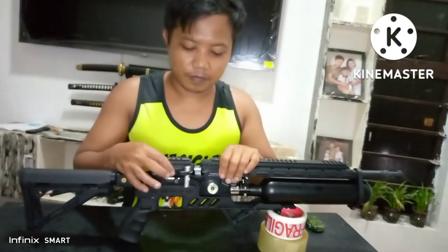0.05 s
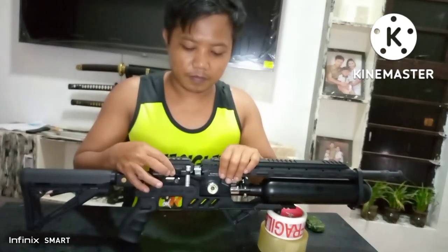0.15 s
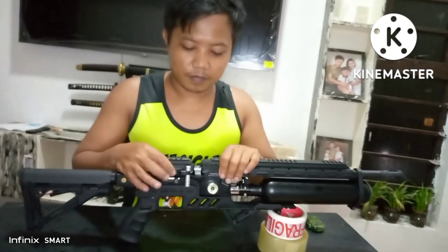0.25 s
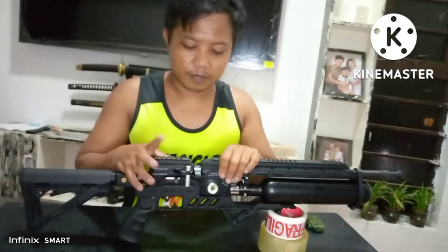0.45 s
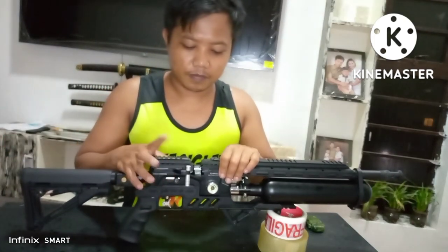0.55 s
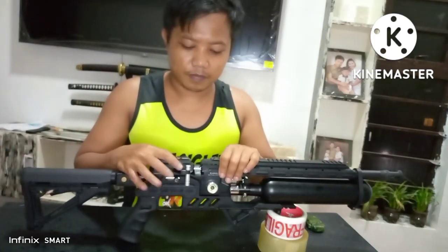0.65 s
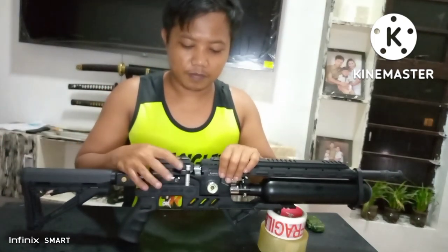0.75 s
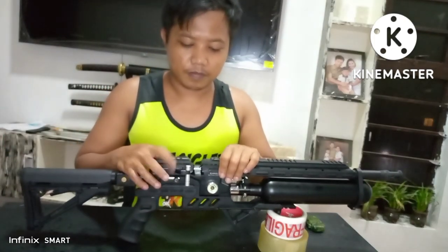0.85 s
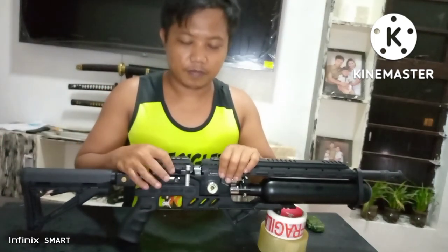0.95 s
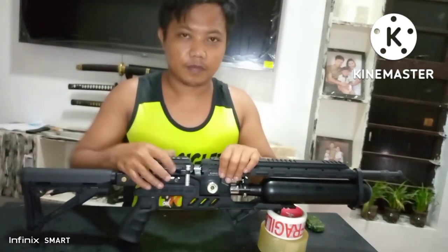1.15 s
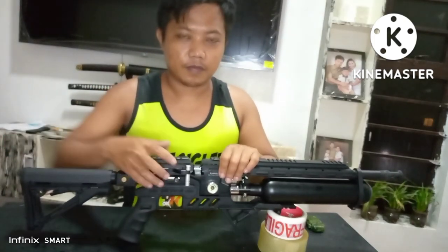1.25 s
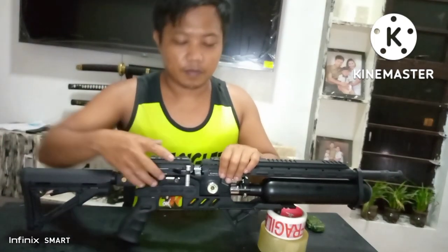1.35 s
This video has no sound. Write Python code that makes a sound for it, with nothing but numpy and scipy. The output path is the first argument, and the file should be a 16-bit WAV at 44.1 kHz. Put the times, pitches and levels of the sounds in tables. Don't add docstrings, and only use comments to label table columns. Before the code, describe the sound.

Hard bright steel snap of a rifle side lever, ringing briefly in a hard-walled room

```python
import sys
import numpy as np
from scipy import signal
from scipy.fft import rfft, irfft, next_fast_len
from scipy.io import wavfile
from scipy.ndimage import uniform_filter1d, map_coordinates

SR = 44100
rng = np.random.default_rng(int(sys.argv[2]) if len(sys.argv) > 2 else 0)


def put_to_file(sound):
    columns = np.atleast_2d(sound).T
    safe = np.clip(columns, -1, 1)
    whole_steps = np.round(safe * 32767)
    wavfile.write(sys.argv[1], SR, whole_steps.astype(np.int16))


def ratio(d):
    e = np.asarray(d, float) / 20
    return 10 ** e


N = 61739


def unit(x):
    return x / np.sqrt(np.mean(x ** 2) + 1e-20)


def along(points, hz):
    f, value = np.transpose(points)
    return np.interp(np.log(hz + 1), np.log(f + 1), value)


def wobble(rate):
    knots = rng.standard_normal(int(N * rate / SR) + 4)
    return map_coordinates(knots, [np.arange(N) * rate / SR])


def filtered(x, response):
    m = next_fast_len(len(x) + SR // 2)
    return irfft(rfft(x, m) * response(np.fft.rfftfreq(m, 1 / SR)), m)[:len(x)]


def through(x, body):
    def response(f):
        total = 0
        for k, (centre, width, db) in enumerate(body):
            band = 1j * f * width / (centre * centre - f * f + 1j * f * width)
            total = total + (-1) ** k * ratio(db) * band ** 2
        return total
    return filtered(x, response)


def swells(rows):
    t = np.arange(N) / SR
    return sum(ratio(db) * np.exp(-np.abs((t - s) / half) ** 3) for s, half, db in rows)


# t/s, level/dB
CHIRP_LEVEL = [
    (0, -55.5),
    (.04, -58.5),
    (.06, -58.5),
    (.1, -53.5),
    (0.127, -64.5),
    (.175, -63.5),
    (.2, -83),
]
# f/Hz, width/Hz, level/dB
CHIRP_BANDS = [(3830, 570, -7), (4217, 82, 0.5)]


def chirp():
    s, db = np.transpose(CHIRP_LEVEL)
    level_db = np.interp(np.arange(N) / SR, s, db, right=-120.0) - 3.5 * wobble(70)
    return ratio(level_db) * unit(through(rng.standard_normal(N), CHIRP_BANDS))


def air(spectrum, patchy_db):
    z = signal.stft(rng.standard_normal(N), nperseg=512)[2]
    field = uniform_filter1d(rng.standard_normal(z.shape), size=4, axis=0)
    field = uniform_filter1d(field, size=12, axis=1)
    noise = signal.istft(z * ratio(patchy_db * unit(field)), nperseg=512)[1][:N]
    return unit(filtered(noise, lambda hz: ratio(along(spectrum, hz))))


# f/Hz, level/dB (per Hz)
BUSTLE_SPECTRUM = [(15, -37), (25, -15), (168, 1), (421, -4.5), (616, -3), (1400, -4.5), (2460, -11),
                   (2660, -10.5), (3000, -13), (3900, -66), (6600, -120)]
HISS_SPECTRUM = [(1760, -11.5), (3000, -3), (4900, -3.5), (6130, -3.5), (7200, -0.5), (10900, -26),
                 (13700, -29), (14900, -15), (16000, -27)]
# f/Hz, width/Hz, level/dB
FAN_WHINE = [(2580, 61, 0.1), (171.5, 40, 4.5)]


def room_tone():
    bustle = ratio(-63.5) * air(BUSTLE_SPECTRUM, patchy_db=1.0)
    hiss = ratio(-68) * air(HISS_SPECTRUM, patchy_db=-1.5)
    whine_db = -73.5 + 2.5 * wobble(12)
    whine = ratio(whine_db) * unit(through(rng.standard_normal(N), FAN_WHINE))
    return bustle + hiss + whine


THUMP_HZ = 73.5


def draught():
    stir = unit(through(rng.standard_normal(N), [(THUMP_HZ, 55, 0)]))
    return ratio(-72.5 + 2 * wobble(13.5)) * stir


# f/Hz, t60/s
ROOM_DECAY = [(800, .35), (1100, 0.44), (1600, 0.35), (2500, 0.46), (3300, 0.33), (5000, 0.4),
              (10000, 0.27), (15000, 0.23)]
# f/Hz, build/s
ECHO_BUILD = [(1000, 0.0083), (2000, 0.0017), (5000, 0.001)]


def echo():
    hz, t, z = signal.stft(rng.standard_normal(SR // 2), SR, nperseg=128)
    decay = ratio(-60 * t / along(ROOM_DECAY, hz)[:, None])
    build = 1 - np.exp(-t / along(ECHO_BUILD, hz)[:, None])
    tail = signal.istft(z * decay * build, SR, nperseg=128)[1][:SR // 2]
    return tail / np.linalg.norm(tail)


# t/s (after the blow), level/dB
WALL_ECHOES = [
    (.0063, -1),
    (.008, -9),
    (.0115, -4),
]


def strike(events, body, modes, rattle_db, rattle_s, ring_db, wet_db, gain_db):
    blow_size, bluntness = 0.78, 0.44
    smear_hz, cut_s = 45.4, 0.19
    out, t = np.zeros(N + SR), np.arange(SR // 2) / SR
    click = 1.0 * (t == 0)
    for s, db in events:
        rattle = 0.23 * ratio(rattle_db - 60 * t / rattle_s) * rng.standard_normal(len(t))
        force = rattle + ratio(wet_db) * echo()
        force[:2] = blow_size, blow_size * bluntness
        for lag, loss_db in WALL_ECHOES:
            force[round(lag * SR)] += ratio(loss_db)
        blow = through(force, body) / np.abs(through(click, body)).max()
        ring = 0
        for hz, level_db, t60 in modes:
            cycles = rng.random() + np.cumsum(hz + smear_hz * wobble(149.8)[:len(t)]) / SR
            ring = ring + ratio(level_db - 60 * t / t60) * np.sin(2 * np.pi * cycles)
        onset = 1 - np.exp(-t / 0.0022)
        ring = ratio(ring_db + 2.7 * wobble(59.4)[:len(t)]) * ring * onset
        out[round(s * SR):][:len(t)] += ratio(db + gain_db - (t / cut_s) ** 6) * (blow + ring)
    return out[:N]


# t/s, peak level/dB
TICK_TIMES = [
    (.0575, -45),
    (.12, -68),
    (.201, -64),
    (1.04, -64),
]
# f/Hz, width/Hz, level/dB
TICK_RESONANCES = [(5770, 5500, 15.5), (8100, 2200, 5), (10100, 820, -17), (14880, 500, 20)]
# f/Hz, level/dB, t60/s
TICK_MODES = [(8800, 5.5, 0.04), (9940, 8, 0.025), (10900, -4, .08)]
TICK_MIX = dict(rattle_db=-4.5, rattle_s=0.043, ring_db=-9, wet_db=9.5, gain_db=1)


def finger_ticks():
    return strike(TICK_TIMES, TICK_RESONANCES, TICK_MODES, **TICK_MIX)


# t/s, peak level/dB
SNAP_TIMES = [
    (.223, -13),
]
# f/Hz, width/Hz, level/dB
SNAP_RESONANCES = [(1033, 480, -13), (2060, 401, -5), (2588, 780, -6), (3724, 800, -7.5), (4803, 646, 1.2),
                   (5680, 990, -2.5), (7040, 1500, -2.5), (8390, 2960, -13), (10630, 2900, -19.5),
                   (15670, 3900, -13.5)]
# f/Hz, level/dB, t60/s
SNAP_MODES = [(1090, -13, 0.68), (2042, -9, 0.6), (2450, -6.5, 0.81), (2700, -7, 0.55), (3807, -10.5, 0.58),
              (4400, -3.5, 0.5), (4908, -3, 0.56), (5086, -6, 0.63), (5910, -6.5, 0.59), (6470, -9, 0.13),
              (7330, -6, 0.34)]
SNAP_MIX = dict(rattle_db=-13, rattle_s=0.051, ring_db=-19, wet_db=14, gain_db=2.5)


def lever_snap():
    return strike(SNAP_TIMES, SNAP_RESONANCES, SNAP_MODES, **SNAP_MIX)


# t/s, half length/s, level/dB, flutter over thump/dB
GUSTS = [
    (0.283, 0.018, -59.5, 1.5),
    (0.455, 0.026, -63.5, -13),
    (0.685, 0.034, -56.5, 2.5),
    (0.803, 0.049, -63, -31),
    (1.083, 0.02, -57, -18.5),
    (1.225, 0.024, -57.5, -20),
]
# f/Hz, width/Hz, level/dB
GUST_FLUTTER = [(324, 110, -3.4), (469, 80, -5.5)]


def puffs():
    thump_hz = THUMP_HZ * np.exp(0.117 * wobble(30))
    swing = np.sqrt(2) * np.sin(2 * np.pi * np.cumsum(thump_hz) / SR)
    thump = swells([row[:3] for row in GUSTS]) * ratio(4.5 * wobble(44)) * swing
    flutter_swells = swells([(s, half, db + over) for s, half, db, over in GUSTS])
    return thump + flutter_swells * unit(through(rng.standard_normal(N), GUST_FLUTTER))


# t/s, half length/s, level/dB
HAND_SCUFFS = [
    (.53, 0.015, -61.5),
    (.985, 0.026, -70),
    (1.38, 0.058, -70.5),
]
# f/Hz, width/Hz, level/dB
TABLE_TOP = [(802, 44, -2.5), (1350, 86, -2)]


def scuffs():
    return swells(HAND_SCUFFS) * unit(through(rng.standard_normal(N), TABLE_TOP))


# t/s, peak level/dB
CATCH_TIMES = [
    (0.6449, -35.5),
]
# f/Hz, width/Hz, level/dB
CATCH_RESONANCES = [(2290, 840, -3.5), (3363, 410, 4), (3830, 270, -3.5), (4020, 500, -0.5),
                    (5400, 1900, -20.5)]
# f/Hz, level/dB, t60/s
CATCH_MODES = [(1900, -16.5, 0.47), (2780, -8, 0.25), (3133, 8.2, 0.062), (3380, -4, 0.098),
               (4030, -0.5, 0.083), (3920, -11, 0.19)]
CATCH_MIX = dict(rattle_db=-13, rattle_s=0.045, ring_db=-9, wet_db=4, gain_db=-3)


def catch_click():
    return strike(CATCH_TIMES, CATCH_RESONANCES, CATCH_MODES, **CATCH_MIX)


# t/s, half length/s, level/dB
CLOTH_RUSTLES = [
    (.92, .015, -76),
    (1.012, .015, -70.5),
    (1.04, 0.017, -65),
]
# f/Hz, width/Hz, level/dB
CLOTH_BANDS = [(5800, 1100, 4), (7400, 1800, 6), (9900, 290, -5), (15100, 1000, -9)]


def rustles():
    grain = ratio(2.5 * wobble(220))
    return swells(CLOTH_RUSTLES) * grain * unit(through(rng.standard_normal(N), CLOTH_BANDS))


def scene():
    background = chirp() + room_tone() + draught()
    lever = finger_ticks() + lever_snap() + catch_click()
    mono = background + lever + puffs() + scuffs() + rustles()
    return mono * ratio([[-6.74], [3.76]])


def top_cut(x):
    return signal.sosfilt(signal.butter(12, 16630, fs=SR, output="sos"), x)


def record(dry):
    duck_db, grab_s, recover_s = 5.5, 0.0012, 0.033
    gate_db, gate_s, gate_half_s = 2, 0.49, 0.051
    top_hz, edge_hz = 15600, 150
    t = np.arange(N) / SR
    since = t - SNAP_TIMES[0][0]
    duck = duck_db * (since > grab_s) * np.exp(-(since / recover_s) ** 2)
    gate = gate_db * np.exp(-((t - gate_s) / gate_half_s) ** 2)
    levelled = dry * ratio(-(duck + gate))
    mix = np.array([filtered(c, lambda hz: np.clip((top_hz - hz) / edge_hz, 0, 1)) for c in levelled])
    return top_cut(mix)


dry = scene()
out = record(dry)
put_to_file(out)
```